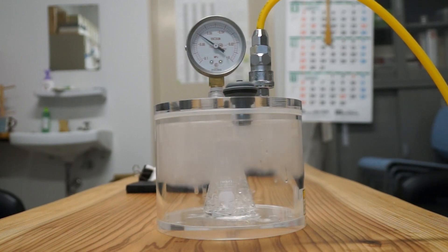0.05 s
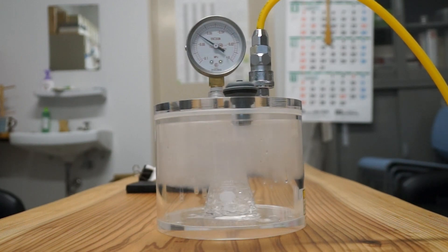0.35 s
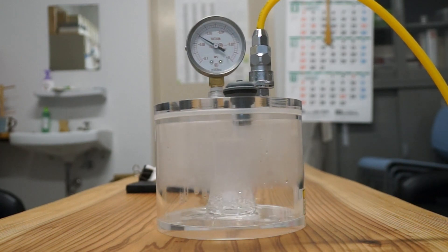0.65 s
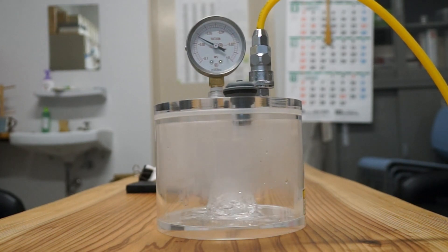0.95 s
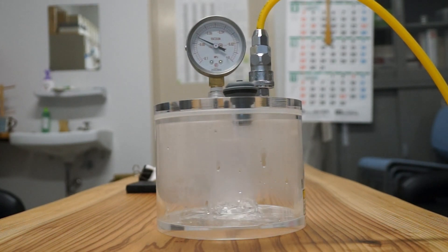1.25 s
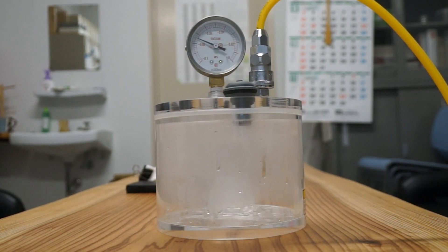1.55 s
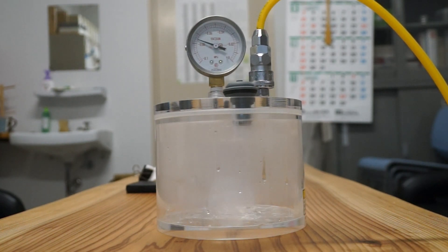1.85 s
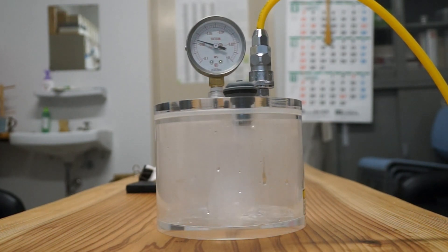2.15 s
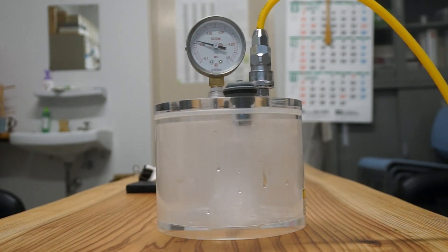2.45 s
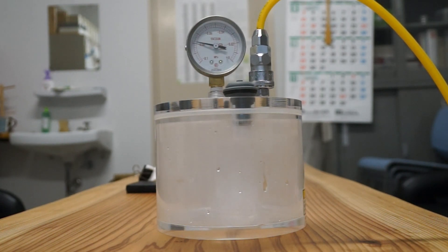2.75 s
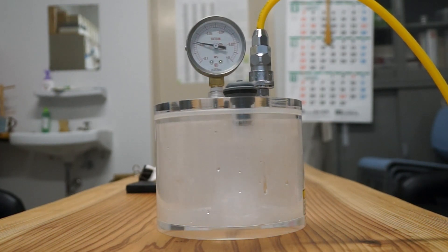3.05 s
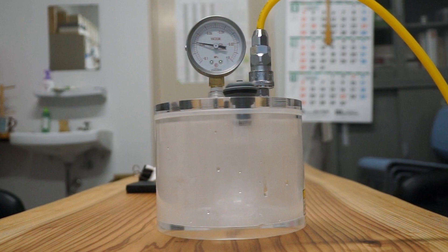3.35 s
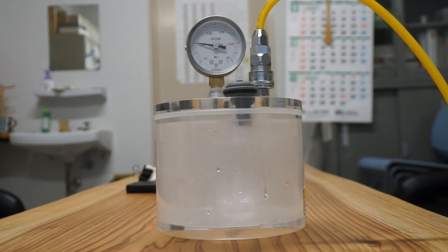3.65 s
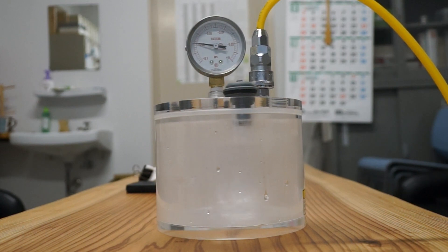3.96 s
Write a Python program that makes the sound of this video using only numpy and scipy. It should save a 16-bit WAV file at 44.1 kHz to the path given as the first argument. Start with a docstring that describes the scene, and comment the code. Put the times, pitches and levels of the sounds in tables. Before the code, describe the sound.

A small vacuum pump drones in a small room, with a whine, churning and a rapid rattle that grows harder from about 1.5 seconds. Near 2.9 seconds a power switch clicks sharply and the pump shudders to a halt. Just after 3 seconds a metallic clack comes from the motor and rings briefly. It fades by about 3.5 seconds, leaving a faint room hum.

```python
"""A rotary-vane vacuum pump drones in a small room: its two vanes clap against the casing, over the
whine and churn of the rotor. As the vacuum deepens, the claps get harder. Near 2.9 s the power switch
clicks and the pump shudders to a halt. A moment later a spring switch in the motor snaps back with a
metallic clack. Its ringing fades, and a faint room hum remains."""
import sys
import numpy as np
from scipy import signal
from scipy.fft import rfft, irfft
from scipy.io import wavfile
from scipy.ndimage import uniform_filter1d, map_coordinates

SR = 44100
rng = np.random.default_rng(int(sys.argv[2]) if len(sys.argv) > 2 else 0)


def master(y):
    """Save y as 16-bit WAV."""
    cut = np.clip(np.atleast_2d(y).T, -1, 1)
    pcm = np.round(cut * 32767)  # scale
    wavfile.write(sys.argv[1], SR, pcm.astype(np.int16))


N = 176400
OFF_S, COAST_S = 2.935, 0.026  # when the power goes off, and how long the rotor runs on
ROTOR_PAN_DB = -2.5  # pan is always left level minus right level


# How hard the ordinary claps hit: t/s, relative level/dB
CLAP_LEVEL = [(0, -40.5), (.8, -41), (1.3, -40.5), (1.6, -35.5), (2.3, -37.5), (2.9, -32)]
# Single claps with a strength of their own, mostly harder: t/s, relative level/dB
HARD_CLAPS = [(0.2044, -32.5), (0.2214, -37), (0.3461, -33.5), (0.3636, -34.5), (0.5401, -41),
              (0.6108, -38.5), (0.7347, -33), (0.7514, -42), (0.7701, -34), (0.8051, -34.5),
              (0.9113, -31.5), (0.9293, -31.5), (0.9464, -31.5), (0.9642, -32.5), (0.9822, -31.5),
              (1.1228, -34), (1.1583, -33), (1.3349, -35), (1.3529, -38.5), (1.4411, -32.5), (1.4945, -32),
              (1.5299, -31), (1.5823, -31), (1.6881, -28), (1.706, -30.5), (1.8297, -30), (1.8647, -30.5),
              (1.8996, -32.5), (1.9355, -29), (1.9524, -31), (2.0238, -27), (2.0413, -27.5),
              (2.1116, -28.5), (2.1296, -31), (2.1824, -30), (2.2169, -30), (2.2882, -27.5),
              (2.3588, -31.5), (2.3935, -30.5), (2.4289, -27.5), (2.4468, -29.5), (2.4643, -29),
              (2.5351, -29), (2.5701, -27), (2.6055, -27.5), (2.6234, -30), (2.6584, -29.5),
              (2.6937, -32.5), (2.7112, -30.5), (2.7641, -30.5), (2.7816, -27), (2.8165, -29),
              (2.8519, -29), (2.8874, -31), (2.9228, -26.5)]
def vanes(turns, tail):
    """Two vanes clap once each per turn, pushing the casing opposite ways."""
    first_clap_s, jitter_s = .0107, .00005
    scatter_db, vane_gap_db, power_off_db = 3, 3.5, -9
    times = np.interp(np.arange(0, turns[-1], .5), turns, clock()) + first_clap_s
    times = times[times < OFF_S + COAST_S]
    level_chance, time_chance = rng.standard_normal((len(times), 2)).T
    push = (-1) ** np.arange(len(times))
    db = curve(times, CLAP_LEVEL) + scatter_db * level_chance
    db -= vane_gap_db / 2 * push  # one vane hits harder than the other
    db += power_off_db * (times > OFF_S)
    for when, strength_db in HARD_CLAPS:
        db[np.argmin(abs(times - when))] = strength_db  # set the nearest clap
    samples = ((times + jitter_s * time_chance) * SR).astype(int)
    return casing(samples, db, push, rotor_load(times), tail) + crack(samples, db, tail)


# The notes the casing rings at: f/Hz, fade time/s, rise time/s, level/dB,
# growth with clap strength/(dB per dB), relative change at full load/dB, pan/dB
CASING_NOTES = [(1633, 0.022, 0.0035, -55, -0.07, 11, -3), (2348, 0.028, 0.00084, -48.5, 0.55, -2.5, -8.5),
                (2730, 0.0048, .001, -59.5, 1.2, -4, 7), (3200, 0.035, 0.00034, -70, 1.2, 6, -26),
                (3772, 0.023, 0.0059, -57, 1.06, -3, -5), (4540, 0.018, 0.00055, -58, 1.15, -4, -4.5),
                (5474, 0.019, 0.00063, -48, 1.5, -0.5, -4.5), (6350, 0.024, 0.0018, -63, 1, -7, 0),
                (7127, 0.018, 0.00032, -60, .8, -3.5, 0.5), (9360, 0.085, .0006, -77, 4, -18, 13)]
def casing(samples, clap_db, push, load, tail):
    """Each clap rings the casing like a bell; its strength and the load change the mix of notes."""
    scatter_db = 0.96  # every clap lands a little differently on each note
    age = clock()[:SR // 10]
    out = 0
    for hz, t60, rise_s, level_db, growth, load_db, pan_db in CASING_NOTES:
        hit_db = growth * clap_db + load_db * load + scatter_db * rng.standard_normal(len(samples))
        hits = np.bincount(samples, push * amp(hit_db), N)
        note = ring(hits, np.sin(2 * np.pi * hz * age) * swell_and_fade(age, rise_s, t60))
        ears = np.array([unit(ear) for ear in in_room(note, tail, echo_db=-0.5)])
        out = out + amp(level_db) * pan(pan_db) * ears
    return out


# Tone colour of a clap's crack: f/Hz, relative level/dB
CRACK_COLOUR = [(800, -14), (2000, -6), (4500, 0), (6500, -9.5), (8000, -6), (10500, -12), (13000, -17),
                (16000, -19.5)]
def crack(samples, clap_db, tail):
    """Each clap also makes a short, bright burst of noise."""
    level_db, growth, rise_s = -52.5, 0.61, 0.0021
    age = clock()[:SR // 10]
    hits = np.bincount(samples, amp(growth * clap_db), N)
    burst = np.minimum(age / rise_s, 1) * decay(age, t60=0.031)
    cracks = colour(ring(hits, burst) * rng.standard_normal((2, N)), CRACK_COLOUR)
    return amp(level_db) * pan(-0.5) * unit(in_room(cracks, tail, echo_db=3))


# How fast the shaft spins: t/s, speed/(turns per s)
SHAFT_SPEED = [(0, 28.29), (2.9, 28.365)]
def shaft_turns():
    """Count the turns the shaft has made so far; they time the claps, whine and churn."""
    return np.cumsum(curve(clock(), SHAFT_SPEED)) / SR


# How hard the rotor works: t/s, share of full load/(0 to 1)
ROTOR_LOAD = [(0, 0.09), (1, 0.25), (1.6, 0.79), (2.9, 0.95)]
def rotor_load(t):
    """The load on the rotor grows as the vacuum deepens."""
    return curve(t, ROTOR_LOAD)


# Pitches of the motor's own tones: f/Hz
MOTOR_HZ = (730, 829.2, 942.3, 968.5)
# Loudness of those tones: level/dB
MOTOR_DB = (-63.5, -59.5, -67, -66.5)
# The rotor's tones: multiple of the shaft speed, level at no load/dB, level at full load/dB, pan/dB
ROTOR_TONES = [(21, -74.5, -73.5, -3), (24, -75, -86, -3), (25, -59.5, -59, -3), (26, -59.5, -60.5, -3),
               (27, -66, -62.5, 0.5), (30, -67, -61, 0), (39, -67.5, -64.5, -2), (41, -62.5, -65.5, -7),
               (43, -77.5, -72.5, -10), (45, -85, -52.5, 1), (46, -65, -70.5, 22.5), (48, -68, -67, -13),
               (57, -76, -56.5, -15), (61, -65, -64.5, -18)]
def whine(turns):
    """Rotor tones change level with the load and beat against motor tones; all fade after the stop."""
    spread_rad, sweep_start_s, sweep_s_per_hz = 0.44, -.0022, .00001
    t = clock()
    load = rotor_load(t)
    motor = sum(amp(db) * tone(hz * t, spread_rad) for hz, db in zip(MOTOR_HZ, MOTOR_DB))
    out = pan(ROTOR_PAN_DB) * motor
    for multiple, no_load_db, full_load_db, pan_db in ROTOR_TONES:
        hz = round(multiple) * SHAFT_SPEED[0][1]
        lag_s = sweep_start_s + sweep_s_per_hz * hz / 2  # high tones lag, so each push sweeps upward
        db = no_load_db + (full_load_db - no_load_db) * load
        out = out + amp(db) * pan(pan_db) * tone(round(multiple) * turns - hz * lag_s, spread_rad)
    return out * decay(np.maximum(t - OFF_S, 0), t60=0.49)


# Tone colour of the churning rotor and oil: f/Hz, relative level/dB
CHURN_COLOUR = [(100, -36), (240, -3.5), (450, -9.5), (620, -4), (740, 0), (900, -0.5), (1030, -10),
                (1250, -0.5), (1430, -8.5), (1680, 0), (1900, -9), (2200, -7.5), (2650, -4), (3400, -13),
                (4600, -9.5), (6500, -17), (10000, -22.5), (15500, -42)]
# Loudness of the churning: t/s, level/dB
CHURN_LEVEL = [(0, -48.5), (1.3, -49), (2.1, -48), (2.9, -50)]
def churn(turns, tail):
    """The rotor rubs the same way on every turn, while the oil adds noise that never repeats."""
    alike_db, oil_db = -1.5, 3
    t = clock()
    one_turn = rng.standard_normal(int(SR / SHAFT_SPEED[0][1]))
    first, second = (map_coordinates(one_turn, [(turns + lag) % 1 * len(one_turn)], mode="wrap")
                     for lag in (0, .5))
    flipped, alike = first - second, first + second  # parts that flip or repeat every half turn
    rub = keep_band(unit(flipped + amp(alike_db) * alike), "high", hz=535, order=4)
    oil = amp(oil_db) * rng.standard_normal(N)
    running = np.clip((OFF_S + COAST_S - t) / COAST_S, 0, 1)
    sound = colour(rub + oil, CHURN_COLOUR) * running * amp(curve(t, CHURN_LEVEL))
    return pan(ROTOR_PAN_DB) * in_room(sound, tail, echo_db=-1)


# Tone colour of the click: f/Hz, relative level/dB
SWITCH_COLOUR = [(500, -13), (1300, 2), (2800, -15), (4050, 9), (5700, 1), (6600, 6), (8500, -21),
                 (11500, -4), (16000, -22)]
def power_switch(tail):
    """The power switch flips with a sharp click."""
    return amp(-30) * pan(-2.5) * blow(OFF_S, SWITCH_COLOUR, tail, rise_s=.0008, t60=0.08, echo_db=-5.5)


# Tone colour of the shudder: f/Hz, relative level/dB
SHUDDER_COLOUR = [(300, -20), (600, -14), (900, -1), (1080, 0), (1350, 10), (2200, 5), (4000, -8),
                  (11500, -6), (13000, -20), (16000, -27)]
def shudder(tail):
    """The pump shakes as it halts: a softer, longer burst of noise."""
    return amp(-42) * pan(3.5) * blow(OFF_S, SHUDDER_COLOUR, tail, rise_s=.005, t60=0.48, echo_db=-5)


# Tone colour of the clack: f/Hz, relative level/dB
CLACK_COLOUR = [(200, -23), (700, -17.5), (2000, -11), (2900, 0), (3400, -10), (4000, -2.5), (4700, 4),
                (6500, 0), (8000, -4.5), (9400, -5), (11000, -7), (12500, -17), (16000, -28)]
# Each time the spring switch hits home or bounces: t/s, relative level/dB
SPRING_HITS = [(3.0258, -5), (3.0284, -3), (3.0312, 4), (3.0324, -6), (3.0365, -6.5)]
# The notes of the spring switch and its housing: f/Hz, fade time/s, level/dB
SPRING_NOTES = [(732, 1.2, -78), (2670, .025, -68), (2990, 0.041, -57.5), (3660, 0.062, -64.5),
                (4420, 0.021, -63), (4647, 0.73, -65.5), (4865, 0.059, -66), (5030, 0.043, -61),
                (5730, 0.055, -65), (6010, 0.041, -80), (6590, 0.022, -59), (9300, 0.014, -60.5),
                (9700, .03, -63)]
def spring_switch(tail):
    """The motor's spring switch clacks home and bounces; every hit rings its metal."""
    clack_s, ring_echo_db = 3.0245, 1.5
    out = amp(-25.5) * blow(clack_s, CLACK_COLOUR, tail, rise_s=.006, t60=0.0552, echo_db=3.5)
    age = clock()[:SR]
    times, hit_db = np.array(SPRING_HITS).T
    for hz, t60, level_db in SPRING_NOTES:
        phases = np.exp(2j * np.pi * rng.random((2, len(times))))  # start anywhere in the wave
        hits = np.zeros((2, N), complex)
        hits[:, (times * SR).astype(int)] = amp(hit_db) * phases
        note = ring(hits, np.exp(2j * np.pi * hz * age) * decay(age, t60)).imag
        echoes = amp(ring_echo_db) * unit(ring(note, tail))
        out = out + amp(level_db) * unit(unit(note) + echoes)
    return pan(-1) * out


# Tone colour of the moving air: f/Hz, relative level/dB
AIR_COLOUR = [(15, -49), (25, -7), (59, -10.5), (144, -7.5), (215, -14), (260, -12.5), (550, -22),
              (1140, -24.5), (3170, -34), (15500, -38.5)]
# The tones of the room's hum: f/Hz, level/dB
HUM_TONES = [(59.2, -71.5), (177.6, -74.5), (328.4, -84.5), (1362, -84.5)]
def ventilation():
    """Quiet ventilation: a rumble alike in both ears, a wide hiss and a faint hum."""
    air_db, side_db = -63, -2.5
    middle, side = colour(rng.standard_normal((2, N)), AIR_COLOUR)
    side = keep_band(side, "high", hz=155, order=1) * np.array([[1], [-1]])
    hum = sum(amp(db) * tone(hz * clock(), spread_rad=0) for hz, db in HUM_TONES)
    return amp(air_db) * (middle + amp(side_db) * side) + hum


def room_tail():
    """The walls return a wash of echoes, different at each ear; the treble dies first."""
    gap_s, shared_db, split_hz = .004, -4.5, 5500
    age = clock()[:SR * 3 // 4] - gap_s
    noise = unit(rng.standard_normal((2, len(age))) + amp(shared_db) * rng.standard_normal(len(age)))
    low = keep_band(noise, "low", split_hz) * decay(age, t60=0.52)
    high = keep_band(rng.standard_normal(noise.shape), "high", split_hz) * decay(age, t60=0.33)
    return unit(low + high) / np.sqrt(len(age))


def in_room(x, tail, echo_db):
    """Mix a sound with its echoes at about the same overall loudness."""
    return (x + amp(echo_db) * ring(x, tail)) / np.hypot(1, amp(echo_db))


def blow(start_s, spectrum, tail, rise_s, t60, echo_db):
    """Parts knock together: a burst of noise swells, dies and echoes."""
    width_db = 8  # the noise that differs between the ears, above the noise they share
    noise = colour(rng.standard_normal(N) + amp(width_db) * rng.standard_normal((2, N)), spectrum)
    burst = swell_and_fade(clock() - start_s, rise_s, t60) * noise
    return burst + amp(echo_db) * ring(burst, tail)


def tone(cycles, spread_rad):
    """A slightly wavering tone; the spread puts the two ears out of step."""
    waver_rad, waver_db = 0.23, 1.5
    phase = 2 * np.pi * cycles + waver_rad * wander(rate_hz=10)
    gain = np.sqrt(2) * amp(waver_db * wander(rate_hz=6.61))
    return gain * np.sin(phase + spread_rad * rng.choice([-1, 1]) * np.array([[1], [-1]]))


def wander(rate_hz):
    """A slow random drift, about 1 in size."""
    hold = int(SR / rate_hz)
    steps = np.repeat(rng.standard_normal(N // hold + 1), hold)
    return unit(uniform_filter1d(uniform_filter1d(steps, hold), hold)[:N])


def colour(x, rows):
    """Shape a sound's lows and highs by rows of f/Hz, level/dB, then scale it to size 1."""
    hz, db = np.array(rows).T
    f = np.maximum(np.fft.rfftfreq(x.shape[-1], 1 / SR), 1)
    gain = amp(np.interp(np.log(f), np.log(hz), db)) * np.minimum(f / hz[0], 1)
    return unit(irfft(rfft(x) * gain, x.shape[-1]))


def keep_band(x, band, hz, order=2):
    """Keep the "low" or "high" side of a frequency; a higher order cuts more sharply."""
    return signal.sosfilt(signal.butter(order, hz, band, fs=SR, output="sos"), x)


def ring(x, response):
    """Let every sample of x set off its own copy of the response."""
    return signal.fftconvolve(np.atleast_2d(x), np.atleast_2d(response), axes=-1)[:, :N]


def swell_and_fade(age, rise_s, t60):
    """Rise in a straight line from age 0, then die away."""
    return np.clip(age / rise_s, 0, 1) * decay(np.maximum(age - rise_s, 0), t60)


def decay(age, t60):
    """Silent before age 0, then 60 dB quieter every t60 seconds (the fade time)."""
    return (age >= 0) * np.exp(-np.log(1000) * np.maximum(age, 0) / t60)


def pan(db):
    """Left and right gains; positive is to the left."""
    return amp(np.array([[db], [-db]]) / 2)


def amp(db):
    """Turn decibels into a gain."""
    return 10 ** (np.asarray(db) / 20)


def unit(x):
    """Scale to an average size (rms) of 1."""
    return x / np.sqrt(np.mean(x ** 2))


def curve(t, rows):
    """Join rows of t/s, value with straight lines."""
    return np.interp(t, *np.array(rows).T)


def clock():
    """The time of every sample, in seconds."""
    return np.arange(N) / SR


def scene():
    """The running pump, its stop and the room."""
    turns, tail = shaft_turns(), room_tail()
    pump = vanes(turns, tail) + whine(turns) + churn(turns, tail)
    stop = power_switch(tail) + shudder(tail) + spring_switch(tail)
    return pump + stop + ventilation()


def record(dry):
    """Cut the deepest rumble and the highest treble."""
    top_hz = 15850
    sound = keep_band(dry, "high", hz=36)
    return signal.sosfilt(signal.ellip(8, .2, 70, top_hz, fs=SR, output="sos"), sound)


dry = scene()
out = record(dry)
master(out)
```